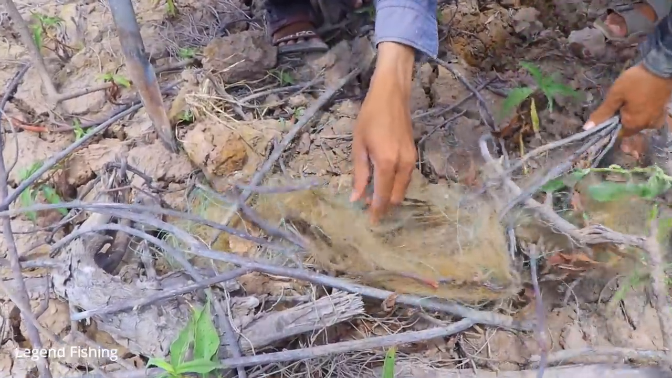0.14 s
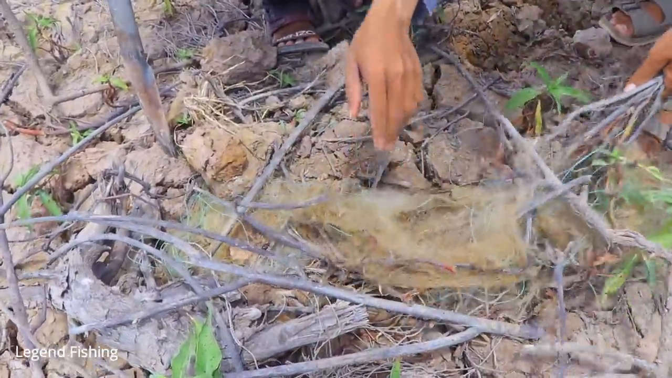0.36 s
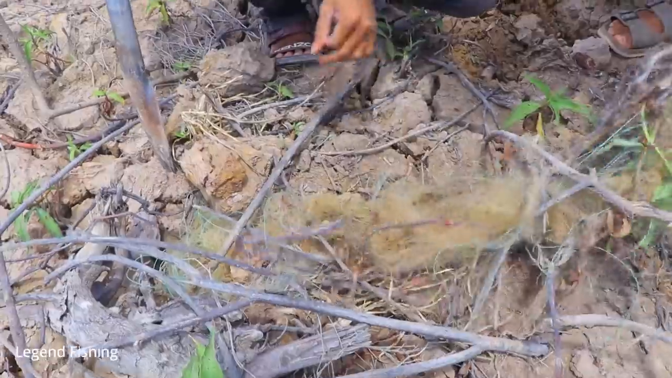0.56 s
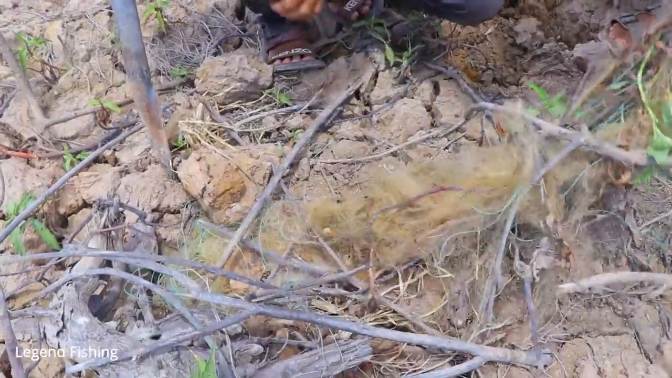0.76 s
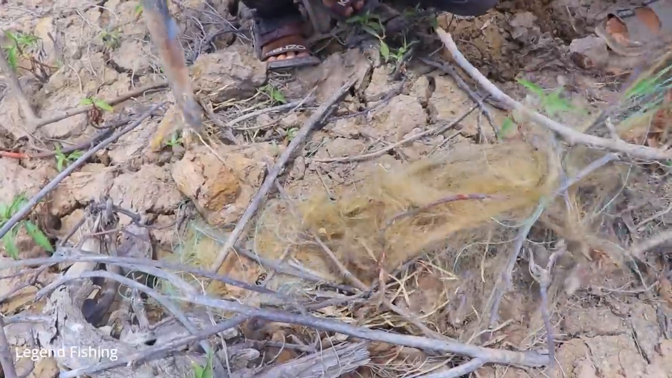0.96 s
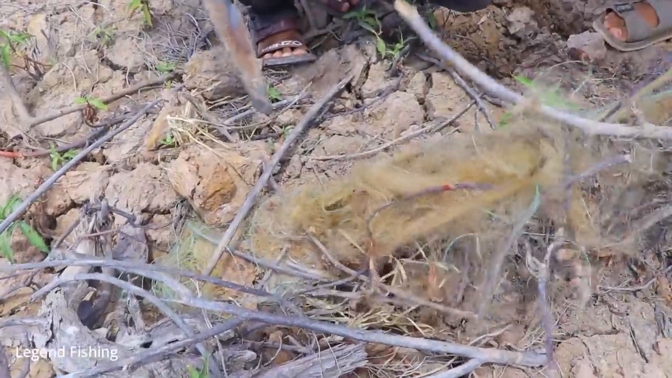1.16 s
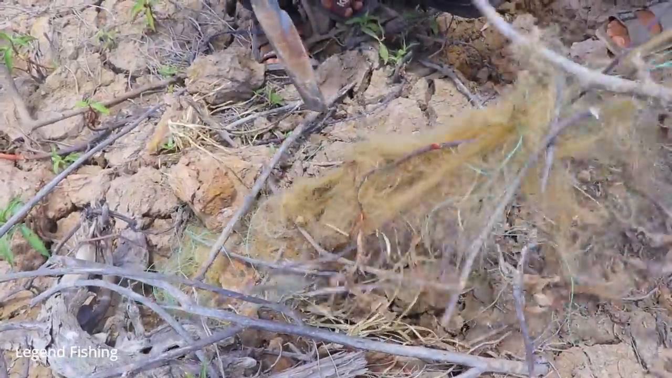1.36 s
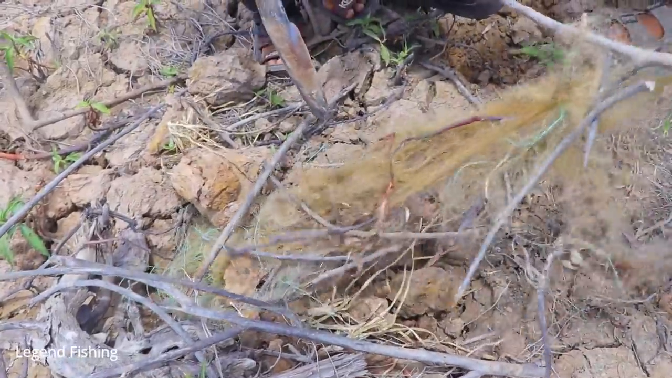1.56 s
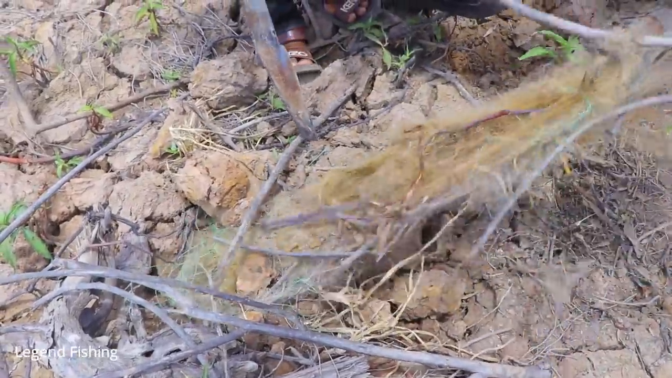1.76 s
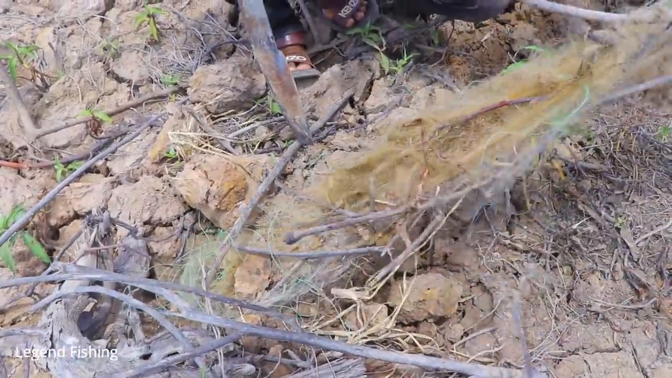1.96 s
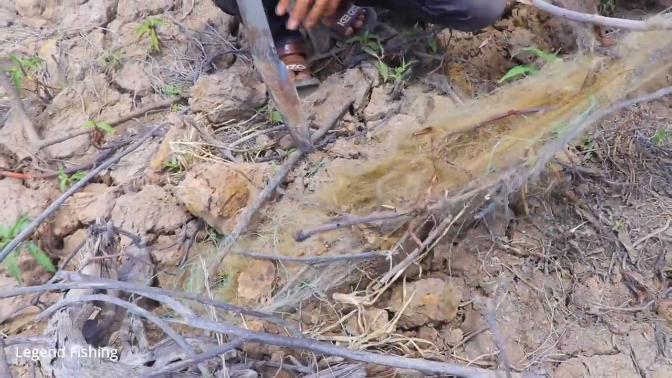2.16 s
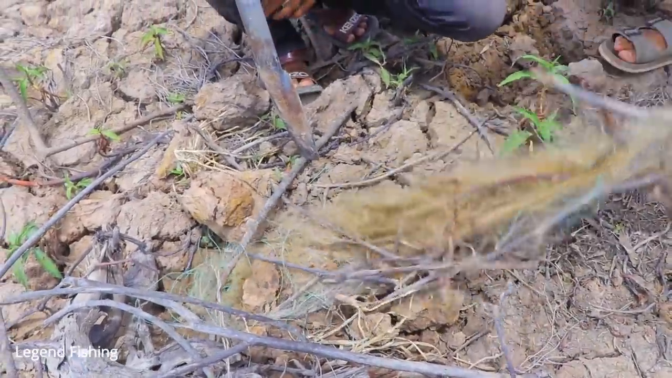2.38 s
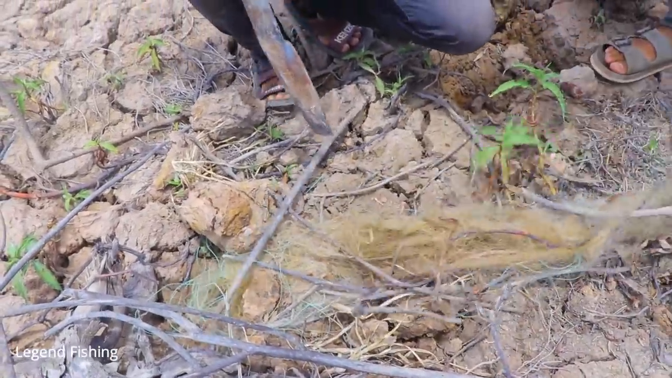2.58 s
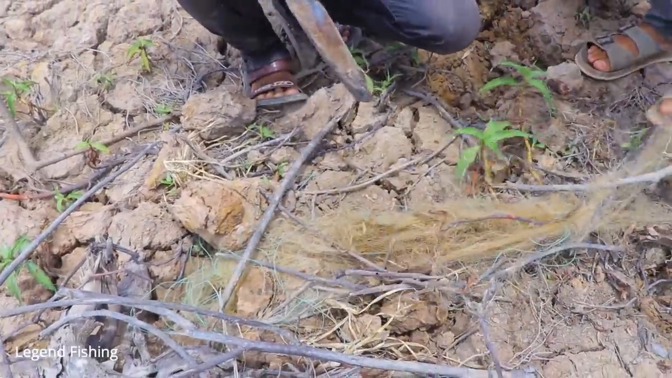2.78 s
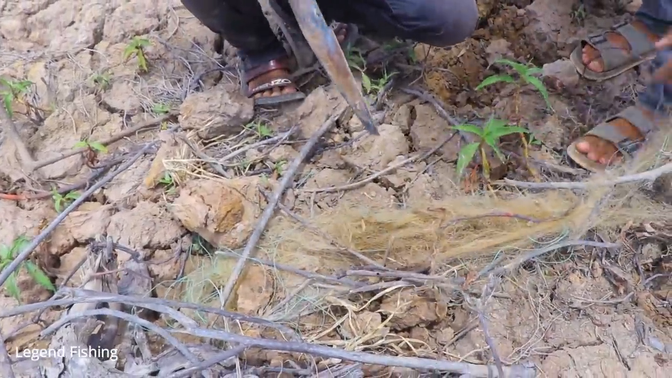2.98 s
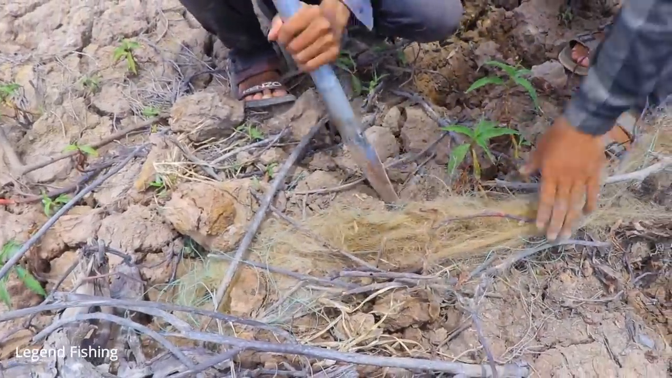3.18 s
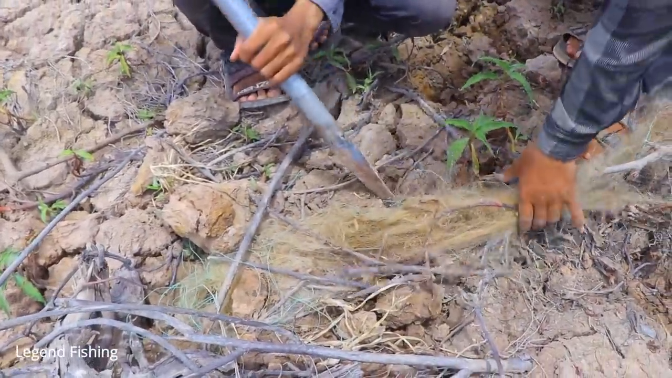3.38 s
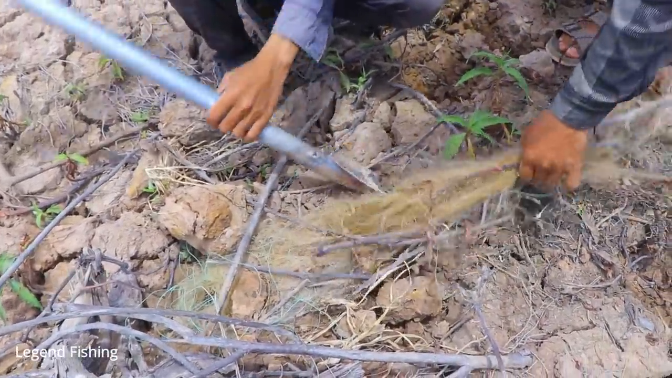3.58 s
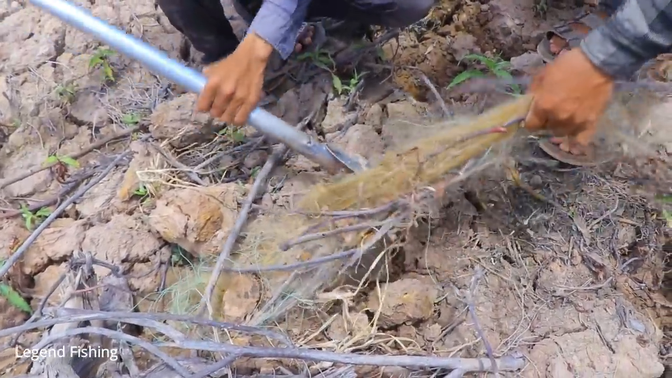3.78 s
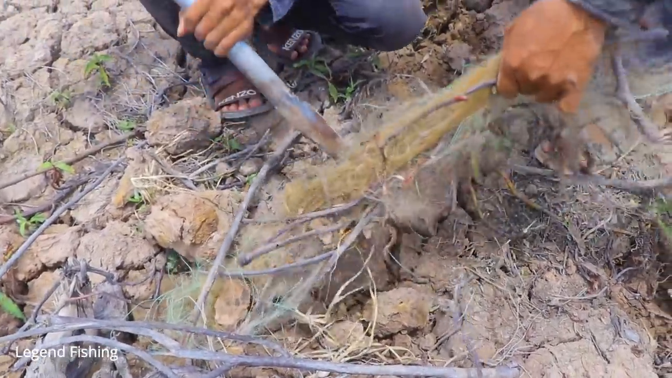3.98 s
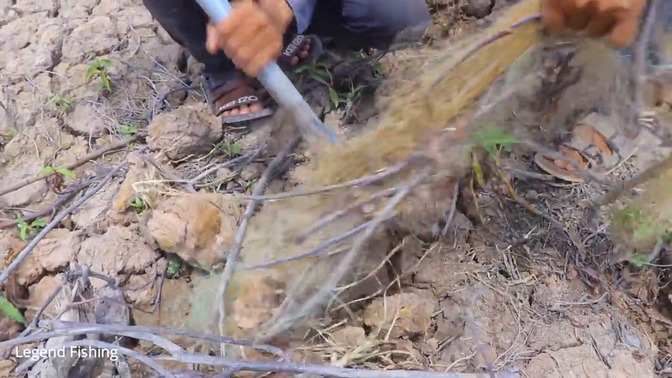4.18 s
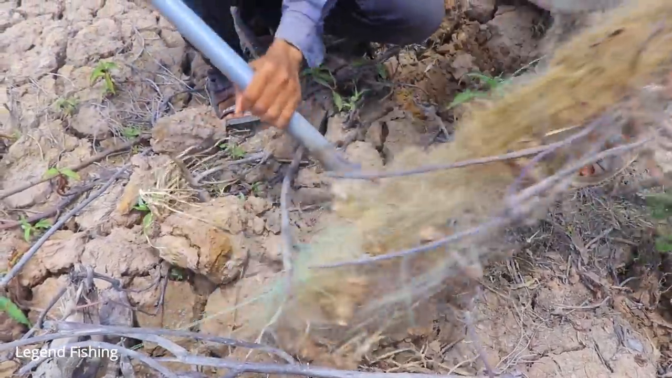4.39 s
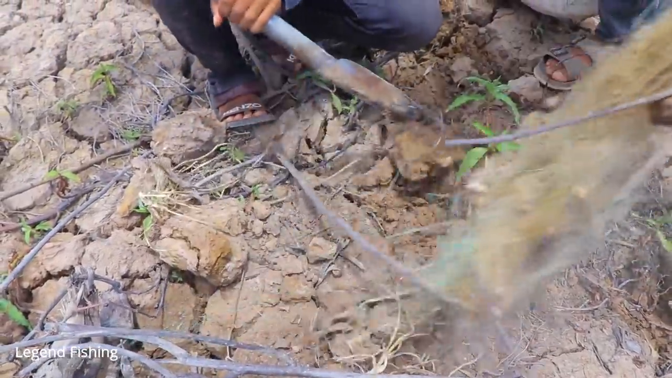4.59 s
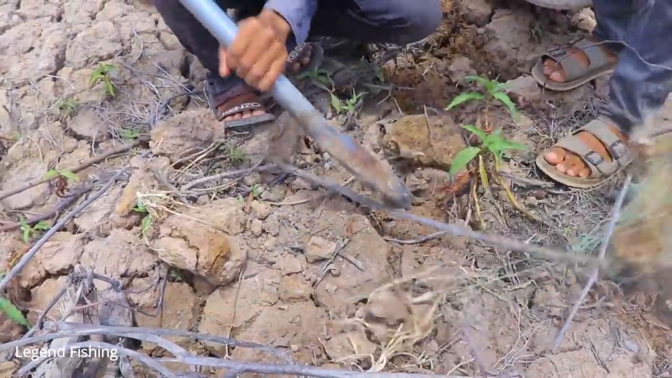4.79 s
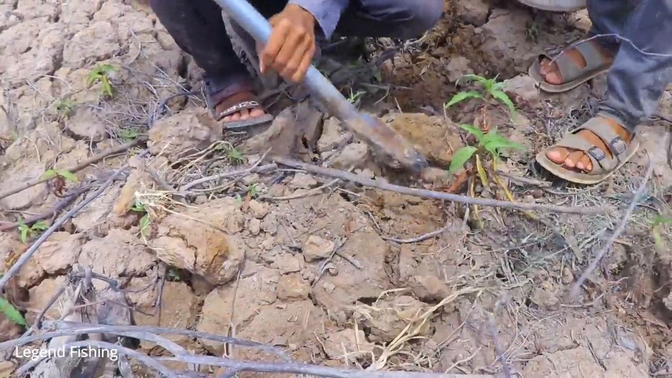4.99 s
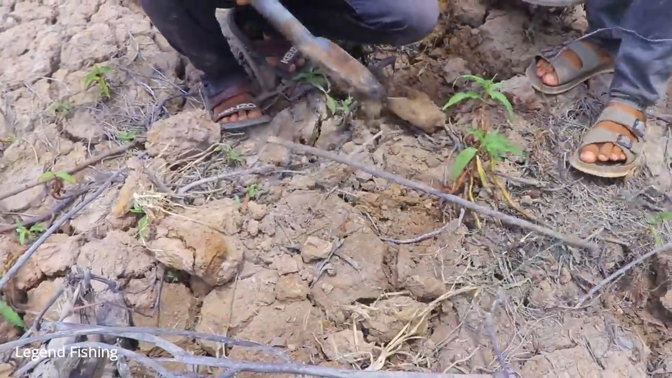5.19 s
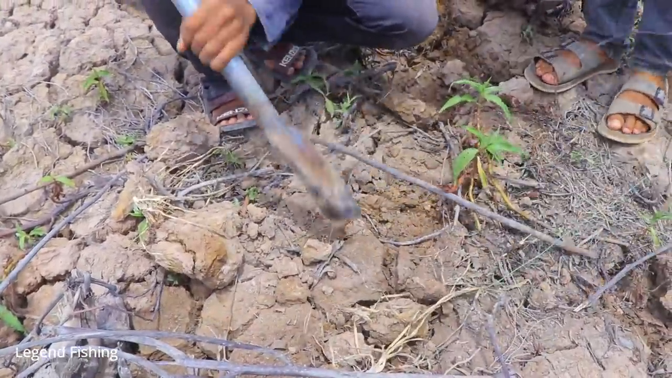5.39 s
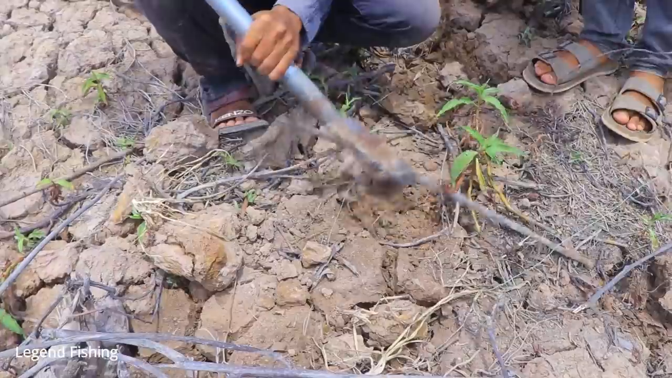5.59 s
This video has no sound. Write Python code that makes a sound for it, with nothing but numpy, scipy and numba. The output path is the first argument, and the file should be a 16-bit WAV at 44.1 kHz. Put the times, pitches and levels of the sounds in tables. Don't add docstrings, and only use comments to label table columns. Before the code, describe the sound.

Dry grass, roots and twigs crackle and snap as they are dragged off hard ground, then a stick chatters and a metal pipe knocks stones in wind.

```python
import sys
import numpy as np
from scipy import signal
from scipy.fft import rfft, irfft, next_fast_len
from scipy.io import wavfile
from scipy.ndimage import uniform_filter1d
from numba import njit

SR = 44100
rng = np.random.default_rng(int(sys.argv[2]) if len(sys.argv) > 2 else 0)


def wrap_up_sound(samples):
    columns = np.atleast_2d(samples).T
    tamed = np.clip(columns, -1, 1)
    steps = np.round(tamed * 32767).astype(np.int16)
    wavfile.write(sys.argv[1], SR, steps)


def nominal_scale(level):
    x = np.asarray(level, float) / 20
    return 10 ** x


N = 248986

# frequency in Hz, level in dB per Hz.
FIBRE_COLOUR = [(2060, -16.5), (3500, -5), (4970, -12.5), (6000, -4.5), (9760, -0.5), (15200, -11.5),
                (16200, -6), (16500, -42)]
# frequency in Hz, level in dB per Hz.
TWIG_COLOUR = [(210, -25), (350, -17), (570, -1), (874, -7), (1390, 1), (1830, -1), (2580, 3.5),
               (4960, -7.5), (6000, -2), (7800, -45), (13200, -120)]
# frequency in Hz, level in dB, time to fall 60 dB in seconds.
STICK_MODES = [(745, -7, 0.052), (1150, -16.5, 0.041), (1308, -2, 0.036), (1715, 2, 0.019),
               (1960, -2, 0.024), (2200, -2, 0.015), (2584, -8, 0.018), (3490, -4, 0.028),
               (6510, -19, 0.023)]
# frequency in Hz, level in dB, time to fall 60 dB in seconds.
PIPE_MODES = [(530, -4, .13), (856, -11, .13), (1080, -8, .15), (1155, -8, .16), (1463, -9, .1),
              (1978, -3, .09), (2261, -13, .1), (2652, -4, .15), (3365, -22, .9), (3478, -12, .1),
              (3693, -13, .2), (4630, -15, .06), (5560, -19, .05)]
# time in seconds, left minus right in dB.
HEAP_PLACE = [(0.0, -7), (1.82, -5.5), (1.9, -5), (3.02, -6.5), (3.14, -3.5), (3.71, -1.5), (3.79, -7.5),
              (4.54, 1), (4.62, -6.5), (5.65, -4)]


def shape(x, points):
    size = next_fast_len(N)
    hz, db = np.transpose(points)
    f = np.maximum(np.arange(size // 2 + 1) * SR / size, 1)
    gain = nominal_scale(np.interp(np.log(f), np.log(hz), db))
    return irfft(rfft(x, size) * gain, size)[..., :N]


def unit(x):
    return x / np.sqrt(np.mean(np.mean(x, axis=0) ** 2))


def sides(pan_db):
    gain = nominal_scale(np.array([pan_db, -pan_db]) / 2)
    return gain / gain.mean(axis=0)


def curves(table):
    s, *columns = np.transpose(table)
    return [np.interp(np.arange(N) / SR, s, c) for c in columns]


def walk(rate):
    k = int(SR / rate)
    held = np.repeat(rng.standard_normal(N // k + 1), k)
    return 1.65 * uniform_filter1d(uniform_filter1d(held, k), k)[:N]


@njit
def rings(at, hz, t60, size, phase, lag):
    out = np.zeros((2, N))
    for k in range(len(at)):
        s = 2j * np.pi * hz[k] / SR - np.log(1000) / (t60[k] * SR)
        turn = np.exp(s)
        for c in range(2):
            start = at[k] + (lag[k] if c == 0 else 0.)
            first = int(np.ceil(start))
            z = size[c, k] * np.exp(1j * phase[k] + s * (first - start))
            for i in range(max(first, 0), min(N, first + int(t60[k] * SR))):
                out[c, i] += z.imag
                z *= turn
    return out


@njit
def low(x, hz, damp):
    y, band, base = np.empty(len(x)), 0., 0.
    for i in range(len(x)):
        g = np.tan(np.pi * hz[i] / SR)
        v = (band + g * (x[i] - base)) / (1 + g * (g + damp))
        y[i] = base + g * v
        band, base = 2 * v - band, base + 2 * g * v
    return y


def crackle(count, lo_hz, hi_hz, cycles, scatter_db, lag, lag_spread, colour):
    u, g = rng.random((4, count)), rng.standard_normal((3, count))
    hz = lo_hz * (hi_hz / lo_hz) ** u[0]
    size = hz * nominal_scale(scatter_db * np.minimum(-np.log(1 - u[1]), 5.5)) * sides(10.5 * g[0])
    t60 = cycles * nominal_scale(3.3 * g[1]) / hz
    x = rings(u[2] * N, hz, t60, size, 2 * np.pi * u[3], lag + lag_spread * g[2])
    return unit(shape(x, colour))


def struck(s, db, ring, modes, lag, pan_db, vary_db, detune):
    s, db, ring = (np.asarray(v)[:, None] for v in (s, db, ring))
    hz, mode_db, t60 = np.transpose(modes)
    g = rng.standard_normal((len(s), 3, len(modes))).transpose(1, 0, 2)
    size = nominal_scale(db + mode_db + vary_db * g[0]) * sides(pan_db + 4.8 * g[2])
    at = (s * SR + 0 * hz).ravel()
    pitch = (hz * (1 + detune * g[1])).ravel()
    return rings(at, pitch, (ring * t60).ravel(), size.reshape(2, -1), 0 * at, 0 * at + lag)


def swells(start, hold, db, rise, fall, rest_db):
    t = np.arange(0, N + 64, 64) / SR
    power = nominal_scale(rest_db) ** 2
    for s, h, d in zip(start, hold, db):
        level = d - rise * np.maximum(s - t, 0) - fall * np.maximum(t - s - h, 0)
        power = power + nominal_scale(level) ** 2
    return np.interp(np.arange(N) / SR, t, 10 * np.log10(power))


def pull():
    # grip in seconds, hold in seconds, fibre crackle in dB,
    # thinnest fibres in dB relative to it, twigs in dB relative to it.
    tugs = [(0.04, 0.22, -39, 6, -3), (0.334, 0.23, -33.5, 3, -3), (0.64, 0.33, -31, 4, -3.5),
            (1.156, 0.1, -32, 2, -10.5), (1.377, 0.17, -39, 5, -4.5), (1.65, 0.068, -39.5, 7, -2),
            (1.81, 0.29, -36, 8, -4), (2.316, 0.03, -33.5, 12.5, -2.5), (2.473, 0.14, -40.5, 6, -6),
            (2.722, 0.023, -41, 3, -1), (2.837, 0.03, -33.5, 0, -2.5), (2.992, 0.009, -35, 4.5, 0),
            (3.476, 0.27, -41.5, 0, -1), (3.8, 0.015, -34, 5, -2.5), (3.912, 0.019, -34.5, -8, -2),
            (4.02, 0.051, -35.5, -1, -11), (4.219, 0.018, -36, -1, 0.5), (4.374, 0.087, -39.5, 2, 4),
            (4.565, 0.021, -37.5, -1, 1), (4.695, 0.011, -31.5, 4.5, -6), (4.838, 0.14, -37, 1, -5),
            (4.98, 0.046, -43, 3, 3), (5.194, 0.18, -38, 1.5, 0.5), (5.511, 0.035, -43, -8, 4.5),
            (5.59, .06, -39, -14, -7), (0.995, 0.073, -45, -5, -1)]
    s, hold, db, thin_db, twig_db = np.transpose(tugs)

    def level(tug_db, rest_db):
        return swells(s, hold, tug_db, rise=149, fall=105, rest_db=rest_db)

    rest_db, rest_twig_db = -49.5, -52.5
    fine_db = level(db, rest_db)
    top_db = level(db + thin_db, rest_db + 2) - fine_db
    return fine_db, top_db, level(db + twig_db, rest_twig_db)


def catches():
    # centre in seconds, length in seconds,
    # fibres in dB, twigs in dB.
    catch_table = [(0.168, 0.041, -2.5, -6), (0.201, 0.028, 6.5, 6.5), (0.448, 0.08, -3.5, -5),
                   (0.516, 0.047, 1, 4), (0.64, 0.057, 0.5, -6), (0.837, 0.075, 0.5, -2.5),
                   (0.942, 0.046, -1, 1), (0.994, 0.075, -6, 0), (1.139, 0.03, -5.5, 2),
                   (1.165, 0.047, 3, 1.5), (1.22, 0.051, 0.5, -1), (1.312, 0.063, 3.5, 3),
                   (1.498, 0.046, 2.5, -2.5), (1.612, 0.085, 2.5, 2), (1.745, 0.023, 3, -4),
                   (1.87, 0.05, -4, -2), (2.073, 0.032, -3, -5), (2.12, 0.062, 1, -2.5),
                   (2.353, 0.095, 2, -1.5), (2.457, 0.035, -2, 2), (2.498, 0.046, -0.5, 2),
                   (2.559, 0.034, 2.5, 4.5), (2.664, 0.03, 7, 1), (2.687, 0.046, -7.5, -1.5),
                   (2.87, 0.036, -6, -2), (2.933, 0.036, -0.5, -4), (3.1, 0.067, -3.5, 4.5),
                   (3.158, 0.073, 0.5, 8), (3.256, 0.048, -14, -3), (3.376, 0.06, -2, -3),
                   (3.42, 0.026, 2.5, 1), (3.517, 0.11, -2, -5), (3.75, 0.037, 4, 3),
                   (3.809, 0.036, 6, -0.5), (3.853, 0.06, 1.5, -3), (4.088, 0.05, -5, -2),
                   (4.119, 0.04, -0.5, 6), (4.266, 0.039, -1.5, -3), (4.608, 0.019, -10, -8),
                   (4.799, 0.024, 2, 5), (5.056, 0.036, -1, 1.5), (5.115, 0.073, -0.5, 6.5),
                   (5.186, 0.022, -5, 1), (5.365, 0.028, -4, -1), (5.433, 0.06, -3.5, -6.5)]
    s, length, *db = np.transpose(catch_table)
    t = np.arange(0, N + 64, 64) / SR
    bell = np.exp(-((t[:, None] - s) / (0.48 * length)) ** 2)
    return [np.interp(np.arange(N) / SR, t, bell @ d) for d in db]


def air():
    # frequency in Hz, level in dB per Hz.
    air_colour = [(88, -5), (150, -4), (190, -12.5), (3930, -18), (4690, -24), (11600, -46), (16500, -43)]
    mid, side = rng.standard_normal((2, N))
    hiss = mid + 0.78 * side * np.array([[1], [-1]])
    return nominal_scale(-41.5 - 12.5) * unit(shape(hiss, air_colour))


def eddies(db):
    corner_hz = np.clip(80 * nominal_scale(0.25 * (db + 39.5) + 2.02 * walk(13)), 20, 900)
    x = rng.standard_normal(N) / np.sqrt(corner_hz)
    x = low(low(x, corner_hz, 0.94), 0.92 * corner_hz, 0.54)
    x = shape(x, [(8, -37), (25, -4.5), (50, -6.0)])
    return nominal_scale(db + 2.7 * walk(24.953)) * x / x.std()


def wind():
    # arrival in seconds, hold in seconds, left in dB, right in dB.
    gusts = [(0, 0.026, -39, -30.5), (0.428, .02, -36.5, -51), (1.02, 0.031, -32.5, -47),
             (1.71, 0.022, -38.5, -47), (1.885, 0.034, -29.5, -37.5), (2.076, 0.033, -50, -36.5),
             (2.453, 0.021, -30.5, -49), (2.55, 0.072, -52, -39.5), (2.719, 0.042, -28, -46),
             (2.997, 0.13, -40.5, -28.5), (3.43, 0.16, -41, -40), (3.696, 0.049, -42, -43),
             (3.978, 0.056, -43, -35.5), (4.183, 0.25, -42.5, -41), (4.5, 0.19, -40, -37),
             (4.772, 0.067, -50, -30), (4.954, 0.3, -26.5, -26), (5.382, 0.039, -21.5, -22),
             (5.619, 0.033, -22, -21.5)]
    # time in seconds, share from 0 to 1.
    shared_gust = [(0, 0.13), (4.85, 0.041), (4.95, 0.94), (5.65, 1)]
    # centre in seconds, rms in dB, pitch in Hz.
    puffs = [(0.016, -33, 88.4), (1.03, -29, 102), (1.103, -27, 74), (1.701, -26.5, 121),
             (1.857, -20.5, 82), (1.894, -23.5, 91), (1.919, -25.5, 128), (2.461, -30, 147),
             (4.335, -31, 202), (2.745, -20.5, 118), (3.037, -24, 166), (3.087, -24, 117), (3.17, -21, 119),
             (3.941, -25, 118), (4.773, -29.5, 80.4), (4.949, -12, 332), (4.968, -16.5, 215),
             (5.102, -20.5, 98.4), (5.138, -21, 141), (5.211, -24, 166), (5.251, -16.5, 188),
             (5.292, -17.5, 175), (5.32, -19.5, 164), (5.38, -21, 148), (5.389, -14.5, 195),
             (5.411, -8.5, 225), (5.418, -13.5, 204), (5.455, -24.5, 185), (5.507, -28, 129),
             (5.594, -14, 185), (5.633, -17, 324), (0.084, -31, 127), (0.106, -33.5, 148),
             (0.426, -33.5, 100), (0.926, -37.5, 98), (1.991, -32, 100), (2.054, -33, 111),
             (2.145, -39, 90), (5.576, -28, 150), (5.605, -21, 198), (5.61, -14, 250)]
    s, hold, *ports_db = np.transpose(gusts)
    left_db, right_db = (swells(s, hold, db, rise=105, fall=94, rest_db=-56) for db in ports_db)
    lean_db = left_db - right_db

    share = np.clip(curves(shared_gust)[0], 0, 1)
    common = eddies((left_db + right_db) / 2 - 5.5)
    common = np.array([common, np.roll(common, shift=30)]) * sides(lean_db)
    own = np.array([eddies(left_db), eddies(right_db)])
    out = np.sqrt(share) * common + np.sqrt(1 - share) * own

    flutter = nominal_scale(-49.5 + 2.82 * (np.maximum(left_db, right_db) + 30))
    flutter = flutter + nominal_scale(pull()[-1] - 9)
    thuds = crackle(count=2500, lo_hz=170, hi_hz=593, cycles=10.2, scatter_db=2.5, lag=2.4, lag_spread=1.8,
                    colour=[(120, 2), (220, 1.0), (450, -8.0), (900, -18), (2000, -50)])
    out += nominal_scale(-6.5) * flutter * sides(0.28 * lean_db) * thuds

    for (s, puff_db, hz), turn in zip(puffs, rng.random(size=len(puffs))):
        near = slice(max(int((s - .04) * SR), 0), min(int((s + .04) * SR), N))
        t = np.arange(N)[near] / SR - s - np.array([[0], [.0007]])
        pan_db = 4.2 * lean_db[int(s * SR)] + 9
        cycle = 2 * np.pi * (hz * t + turn)
        push = np.cos(cycle) + 0.23 * np.sin(2 * cycle) + 0.078 * np.cos(3 * cycle)
        bell = np.exp(-(t * hz / 0.54) ** 2)
        out[:, near] += nominal_scale(puff_db + 1.5) * sides(pan_db)[:, None] * bell * push
    return out


def grass():
    fine_db, top_db, coarse_db = pull()
    pan_db, = curves(HEAP_PLACE)
    fine_catch_db, coarse_catch_db = catches()
    clump = .2 * walk(22) + 1.1 * walk(70)
    fine_db = fine_db + fine_catch_db - 0.5 + 1.2 * clump + .8 * walk(45)
    coarse_db = coarse_db + coarse_catch_db - 2.07 + 1.3 * clump + .8 * walk(24.84)

    fibres = crackle(count=70000, lo_hz=3440, hi_hz=18200, cycles=11.0, scatter_db=2.5,
                     lag=4.88, lag_spread=1.0, colour=FIBRE_COLOUR)
    top = shape(fibres, [(10000, -29), (12000, -2.0)])
    fine = nominal_scale(fine_db) * sides(pan_db) * (fibres + (nominal_scale(top_db) - 1) * top)

    twigs = crackle(count=30000, lo_hz=250, hi_hz=6160, cycles=19.0, scatter_db=2.5,
                    lag=2.26, lag_spread=3.46, colour=TWIG_COLOUR)
    pings = crackle(count=900, lo_hz=450, hi_hz=5000, cycles=40, scatter_db=2.5,
                    lag=5.2, lag_spread=2.2, colour=TWIG_COLOUR)
    return fine + nominal_scale(coarse_db) * sides(0.28 * pan_db) * (twigs + .35 * pings)


def snaps():
    # time in seconds, tick peak in dB, body peak in dB, flare after the tick in dB.
    snap_table = [(0.016, -13.5, -25, -18), (0.0935, -15.5, -17.5, -10.5), (0.1329, -21, -22.5, -10),
                  (0.237, -15, -28, -14), (0.424, -16.5, -30, -4), (0.5394, -12, -33, -13),
                  (0.56, -16.5, -38, -9.5), (0.7104, -17, -26, -10), (0.8865, -29, -30, -1),
                  (1.111, -22.5, -28, -7), (1.2434, -27, -46, 5), (1.259, -19.5, -50, 1.5),
                  (1.281, -23.5, -38, 9), (1.465, -17.5, -28, -10.5), (1.626, -13, -27.5, -14),
                  (1.8002, -18.5, -45, -11), (1.834, -19.5, -40, -3), (1.8707, -11, -48, -20),
                  (1.9267, -22, -27, -2), (1.9467, -24.5, -17.5, -0.5), (2.092, -19, -39, -16),
                  (2.2121, -18.5, -28.5, -10.5), (2.322, -24.5, -33, 3.5), (2.575, -37, -40, -5),
                  (3.0251, -19, -18.5, -15), (3.551, -29, -27.5, 1.5), (3.7207, -22.5, -25.5, -3),
                  (3.791, -26, -30, -14), (3.905, -12, -53, -13), (5.049, -28.5, -38, 0)]
    s, db, body_db, tail_db = np.transpose(snap_table)
    hz = 8900 * nominal_scale(0.32 * (db + 18.5))
    s = s + .0012
    at = (s * SR).astype(int)
    pan_db, = curves(HEAP_PLACE)
    ticks = rings(s * SR, hz, 13 / hz, nominal_scale(db + 8) * sides(pan_db[at]), 0 * s, 0 * s + 4.8)

    flare, t = np.zeros((2, N + SR)), np.arange(SR // 10) / SR
    fall = np.exp(-t / .0035) * (1 - np.exp(-t / .0003))
    for start, gains in zip(at, nominal_scale(np.array([db + tail_db + 2.0, body_db - 6.5])).T):
        flare[:, start:start + len(t)] += gains[:, None] * fall
    bright = crackle(count=100000, lo_hz=3420, hi_hz=16320, cycles=68, scatter_db=-1.5,
                     lag=6.5, lag_spread=0.23, colour=FIBRE_COLOUR)
    body = crackle(count=30000, lo_hz=383, hi_hz=6100, cycles=13.0, scatter_db=3.0,
                   lag=4.0, lag_spread=2.8, colour=TWIG_COLOUR)
    return ticks + (flare[0, :N] * bright + flare[1, :N] * body) * sides(pan_db)


def splinters():
    # time in seconds, peak in dB, pitch in Hz.
    splinter_table = [(0.0222, -19, 9900), (0.0757, -24, 8600), (0.0947, -16, 9600), (0.1458, -23, 9700),
                      (0.1967, -21, 9500), (0.2109, -25, 9100), (0.315, -24, 8700), (0.3419, -22, 9100),
                      (0.3766, -21, 8700), (0.4275, -10, 8100), (0.4376, -21, 11000), (0.4919, -21, 7900),
                      (0.5086, -20, 7400), (0.7, -16, 9200), (0.7319, -20, 8600), (0.7617, -18, 11000),
                      (0.7737, -21, 10000), (0.9437, -22, 10600), (1.2027, -17, 11100), (1.2478, -19, 8600),
                      (1.3249, -20, 7000), (1.627, -12, 12500), (1.8021, -14, 10000), (1.8921, -24, 10600),
                      (1.914, -23, 8700), (1.9288, -18, 8900), (1.9411, -22, 10300), (1.9476, -21, 7800),
                      (1.8719, -15, 12200), (1.9965, -24, 10300), (2.116, -19, 12200), (2.1517, -24, 12500),
                      (2.2144, -19, 8600), (2.2475, -25, 11400), (2.2893, -20, 12400), (2.2934, -21, 12100),
                      (2.3248, -16, 11400), (2.3345, -15, 12800), (2.4639, -25, 10500), (2.486, -22, 8800),
                      (2.5775, -16, 12800), (3.0002, -22, 8600), (3.1298, -27, 3800), (3.3307, -31, 8100),
                      (3.3753, -32, 5900), (3.5516, -23, 7600), (3.6079, -23, 8200), (3.9061, -11, 12600),
                      (4.6756, -24, 4300), (4.695, -20, 9400), (4.717, -20, 10600), (4.8738, -16, 4500),
                      (4.9209, -24, 8900), (4.9941, -22, 8100), (5.0508, -21, 7300), (5.3024, -22, 8800),
                      (5.3787, -25, 7000)]
    s, db, hz = np.transpose(splinter_table)
    pan_db, = curves(HEAP_PLACE)
    size = nominal_scale(db + 4.5) * sides(pan_db[(s * SR).astype(int)])
    x = rings(s * SR, hz, 9.0 / hz, size, 0 * s, 0 * s + 4.8)
    x = x + rings(s * SR, .4 * hz, 7.0 / hz, nominal_scale(-15) * size, 0 * s, 0 * s + 4.8)
    return shape(x, [(500, -25), (2500, 0)])


def knocks():
    # time in seconds, peak in dB, pitch in Hz, left minus right in dB.
    knock_table = [(0.094, -30.5, 475, -4.0), (0.268, -25, 585, -2), (0.684, -26.5, 694, -4),
                   (0.742, -24.5, 586, 0), (0.971, -18.5, 1370, -11), (1.0, -23, 980, -13),
                   (1.947, -32, 2160, -15), (2.264, -22, 745, -6), (2.309, -28, 1130, 16),
                   (2.611, -27, 606, -6), (3.002, -21, 1210, -5), (3.129, -18.5, 1530, 0),
                   (3.375, -21, 1390, 0), (3.435, -23, 2080, 4), (3.471, -26, 1340, 0),
                   (3.725, -22, 845, 3), (3.905, -23, 2320, -4.5), (4.192, -18.5, 1960, -1),
                   (4.674, -24, 2550, -5.0), (4.694, -23, 585, -2.0), (5.184, -27, 636, 1),
                   (5.504, -24, 1260, -2), (.412, -20, 2460, -10), (0.492, -18.5, 2370, -15),
                   (0.581, -29.5, 447, -2), (.722, -26, 624, -2), (0.934, -26, 1800, -4),
                   (1.387, -35.5, 424, 0), (1.412, -35.5, 343, 0), (1.771, -31.5, 610, 0),
                   (3.237, -18, 2530, 5), (3.253, -29, 1380, 0), (3.263, -31, 900, 0),
                   (3.271, -34.5, 440, 0), (4.185, -34, 553, 0), (5.378, -24, 3000, 5),
                   (5.499, -19, 2110, -8)]
    s, db, hz, pan_db = np.transpose(knock_table)
    at = (s + 0.00059) * SR
    out = 0
    for ratio, part_db in [(0.62, -13), (1, 1.5), (1.55, -4), (2.4, -4), (3.9, -3)]:
        part_hz = hz * ratio
        size = nominal_scale(db + part_db) * sides(pan_db)
        for cycles, sign in [(12, 1), (2, -1)]:
            out = out + sign * rings(at, part_hz, cycles / part_hz, size, 0 * s, 0 * s + 2.0)
    return out


def scuffs():
    # start in seconds, length in seconds, rms in dB,
    # pipe ringing in dB, left minus right in dB.
    scuff_table = [
        (3.195, 0.026, -18.5, -40, -2),
        (4.316, 0.014, -24.5, -38.5, -3),
        (4.686, 0.02, -33.5, -53, -6),
        (4.947, 0.024, -22.5, -31, -3),
    ]
    # start in seconds, length in seconds, rms in dB.
    grazes = [
        (2.9, 0.0025, -42),
        (3.8, 0.016, -35.5),
        (4.4, 0.0074, -25),
        (4.876, 0.0069, -21.5),
        (5.543, 0.01, -29),
    ]
    # frequency in Hz, level in dB per Hz.
    soil_colour = [(120, -41), (200, -10.5), (784, -12), (1580, -3.5), (1800, -8.5), (2600, -2), (3130, -7),
                   (8810, -4), (15000, -15.5), (16500, -44)]
    t = np.arange(N) / SR
    grit = crackle(count=90000, lo_hz=200, hi_hz=17000, cycles=7, scatter_db=1.4,
                   lag=2.2, lag_spread=2.2, colour=soil_colour)

    def swell(s, length, rise, fall):
        return np.clip((t - s) / rise, 0, 1) * np.exp(-np.clip(t - s - length, 0, 1) / fall)

    out = 0
    for s, length, db, pipe_db, pan_db in scuff_table:
        bumps = s + length * rng.random(size=12)
        steel = struck(bumps, 0 * bumps + pipe_db, 0 * bumps + .6, PIPE_MODES,
                       lag=1.5, pan_db=pan_db, vary_db=4, detune=.003)
        out = out + nominal_scale(db) * swell(s, length, 0.0057, 0.0074) * sides(pan_db)[:, None] * grit + steel
    for s, length, db in grazes:
        out = out + nominal_scale(db) * swell(s, length, 0.0018, 0.0024) * grit
    tip = struck([3.236], [-41], [1], [(4160, 0, 0.17)], lag=0, pan_db=1, vary_db=-10, detune=0)
    return out + tip


def stick():
    # time in seconds, peak in dB.
    chatter = [(4.2967, -18), (4.3106, -16), (4.3243, -10), (4.331, -7.5), (4.373, -12), (4.3795, -16),
               (4.3874, -9), (4.4012, -7), (4.4142, -9.5), (4.439, -6), (4.452, -14), (4.46, -18),
               (4.4742, -7), (4.5111, -25), (4.3915, -18), (4.5428, 0), (4.551, -20), (4.554, -8),
               (4.565, -9), (4.598, -27)]
    s, db = np.transpose(chatter)
    after = np.cumsum(0.000805 + rng.random((len(s), 4)) * 0.001944, axis=1)
    after -= after[:, :1]
    hits = (s[:, None] + after + 0.00097).ravel()
    hits_db = (db[:, None] - 12.5 - 4000 * after).ravel()
    x = struck(hits, hits_db, np.ones(after.size), STICK_MODES, lag=1.0, pan_db=-1.5, vary_db=4.0, detune=0.011)
    return shape(x, [(300, -19), (650, -7.0), (2680, 2.0), (2850, -15), (3500, -6.0),
                     (4500, -4), (5800, 1), (6800, 10.0)])


def pipe():
    # time in seconds, peak in dB, ring as a factor on the decay, attack in seconds.
    blows = [
        (4.8732, -10.5, 0.98, 0.0006),
        (5.547, -9.5, 0.27, 0.0015),
        (5.61, -16, 0.27, 0.004),
    ]
    s, db, ring, attack = np.transpose(blows)
    crack = struck(s + 0.000624, db - 12.0, 0.48 * ring, STICK_MODES,
                   lag=0.48, pan_db=1, vary_db=3.5, detune=0.19)
    crack = shape(crack, [(350, -39), (700, 8.0)])
    tube = struck(s + .001, db - 10, ring, PIPE_MODES, lag=1.5, pan_db=-3, vary_db=1.2, detune=.002)
    out = crack + tube
    for at, rise in zip(s, attack):
        since = np.arange(N) / SR - at
        out = out * np.where(since > 0, 1 - np.exp(-np.abs(since) / rise), 1)
    return out


def scene():
    # frequency in Hz, level in dB.
    shade = [(300, -3), (1000, 2), (2400, -8), (5000, 1), (15000, -4.5)]
    left, right = grass() + snaps() + splinters()
    heap = np.array([shape(left, shade), right])
    return heap + knocks() + stick() + pipe() + scuffs() + air() + wind()


def roll_off(x):
    return signal.sosfilt(signal.butter(12, 16990, fs=SR, output="sos"), x)


def record(dry):
    rounded = np.tanh(0.93 * dry) / 0.88
    mix = shape(rounded, [(4400, 1.0), (4950, -3), (5400, -1), (15800, -1.5), (16100, -28), (17000, -40)])
    return roll_off(mix)


dry = scene()
out = record(dry)
wrap_up_sound(out)
```